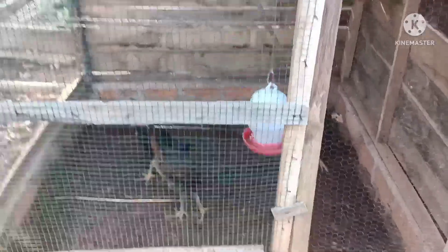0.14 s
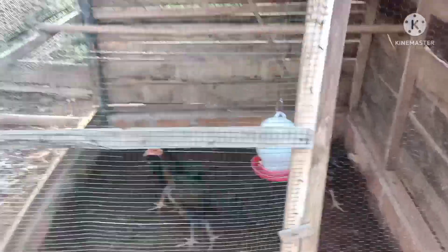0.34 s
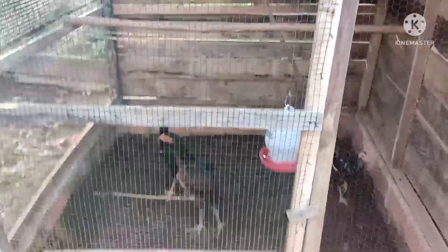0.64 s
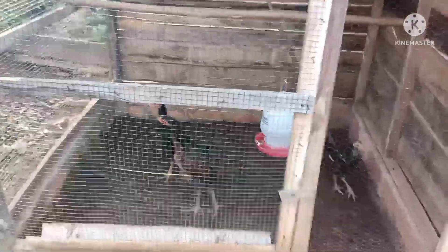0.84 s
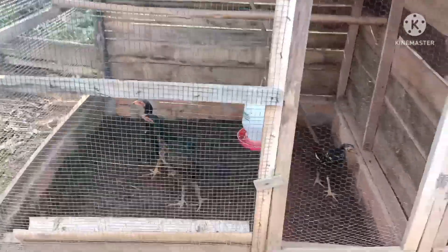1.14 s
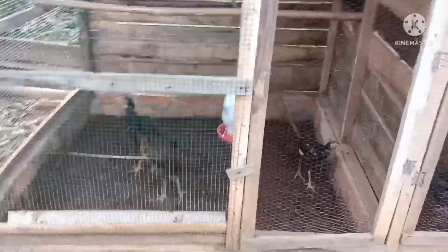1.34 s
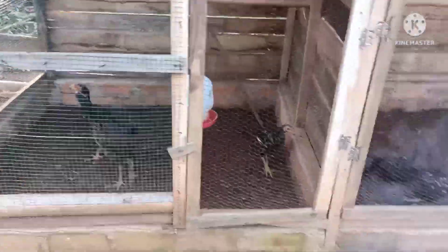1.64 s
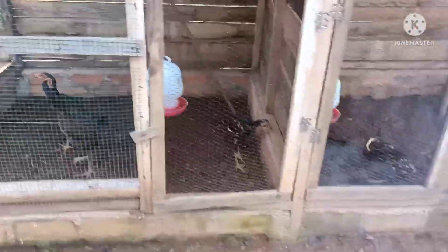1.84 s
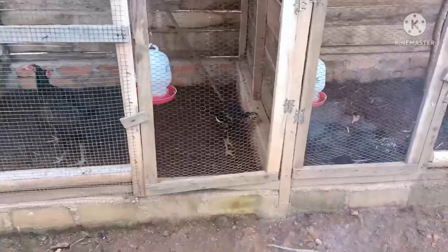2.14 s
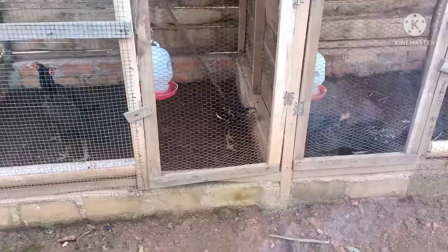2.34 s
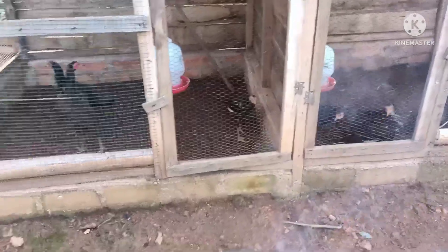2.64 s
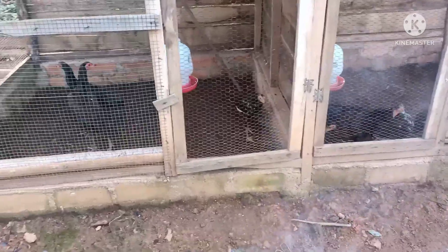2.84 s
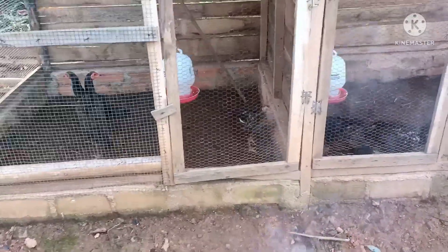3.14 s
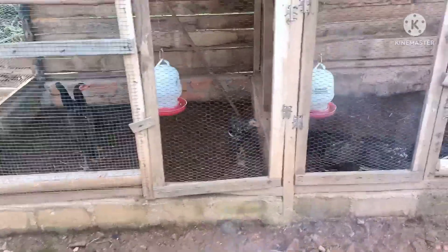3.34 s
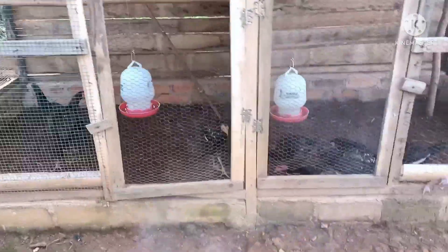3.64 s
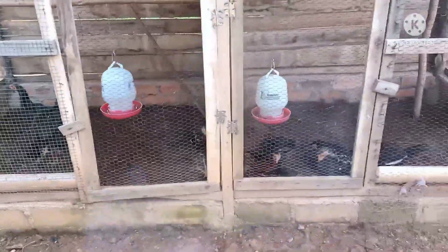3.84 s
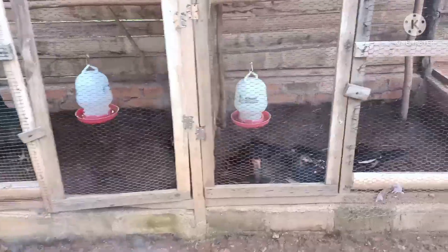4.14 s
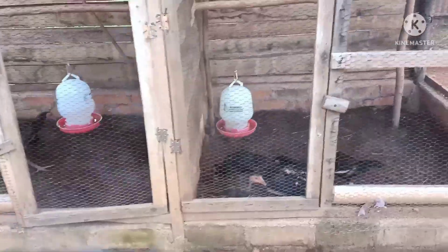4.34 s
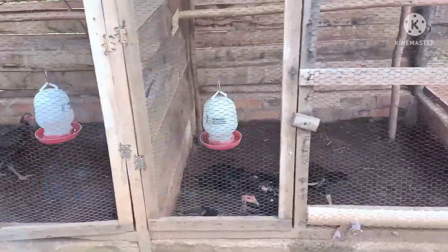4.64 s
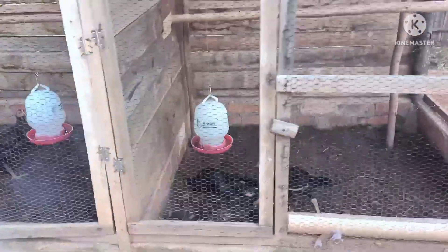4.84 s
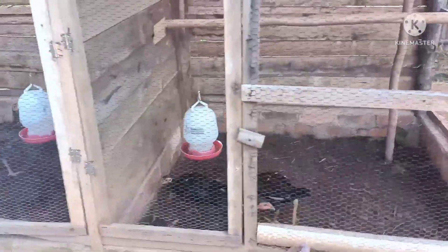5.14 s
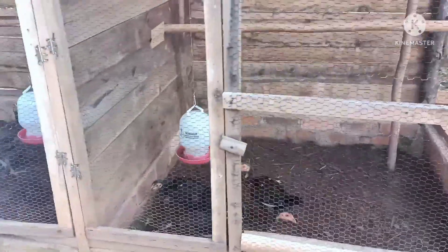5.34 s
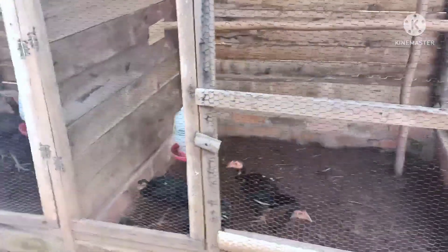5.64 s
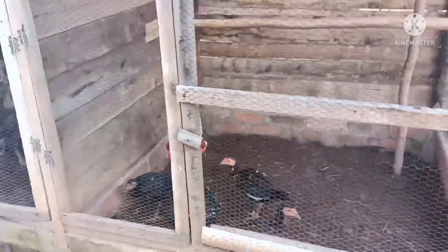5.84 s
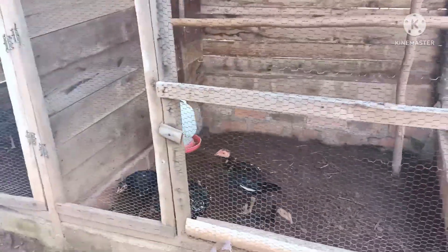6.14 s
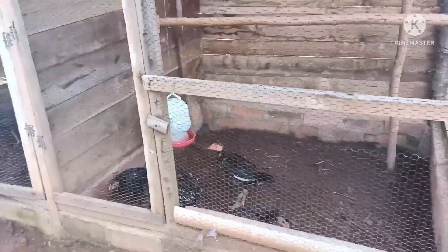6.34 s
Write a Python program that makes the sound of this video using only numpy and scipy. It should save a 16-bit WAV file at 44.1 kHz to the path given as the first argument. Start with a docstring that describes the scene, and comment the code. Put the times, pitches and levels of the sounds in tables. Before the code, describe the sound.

After some finger bumps on the microphone, chickens call hoarsely and cluck, with light pecking and faint peeps in a wooden coop.

```python
"""Hens in a plank and wire coop

Hens give three drawn-out calls that break into a rasp, among short clucks and soft croons: syrinx
harmonics shaped by throat and beak. Young birds peep, pecks ring on wood and wire, and the coop echoes.
A hand rubs and bumps the right microphone port at first. Behind it all lie spells of thin, high hiss
and a quiet outdoor rumble."""
import sys
import numpy as np
from scipy import signal
from scipy.fft import rfft, irfft
from scipy.io import wavfile
from scipy.ndimage import map_coordinates

SR = 44100
rng = np.random.default_rng(int(sys.argv[2]) if len(sys.argv) > 2 else 0)


def unload_audio(sound):
    """Save the sound as a 16-bit wav file, at the path given as the first command line argument."""
    columns = np.transpose(np.atleast_2d(sound))
    # keep every value between -1 and 1, then stretch to whole-number steps
    steps = np.round(np.clip(columns, -1, 1) * 32767)
    wavfile.write(sys.argv[1], SR, steps.astype(np.int16))


N = 285812
TIME = np.arange(N) / SR

# The throat of a calling hen. Each row: frequency in Hz, gain in dB.
CALL_THROAT = [(300, -41), (600, -27), (780, -21.5), (1100, 0), (1300, 4.5), (1550, -8), (1900, -13),
               (2550, -15.5), (3200, -23.5), (4500, -38.5), (5600, -42), (7000, -41.5), (10000, -62),
               (15000, -66)]
# Drawn-out calls. Each row: start and length in seconds, held pitch in Hz, level, brightness and
# fundamental boost in dB, roughness 0-1, overshoot as a share of pitch, its width in seconds, climb as a
# share of pitch, its time constant in seconds, seconds until the break, break boost in dB,
# left lead in ms, left minus right in dB.
CALLS = [(0.719, 0.276, 622.5, -29, 5.5, 2.5, 0.03, .11, 0.027, .16, .048, 0.24, 8, 0.5, -6),
         (2.973, 0.2768, 618.4, -33.5, 4.5, -0.5, 0.01, 0.037, 0.043, .145, .04, .238, 14.5, 0.44, 0),
         (4.826, 0.28, 635, -31.5, 3.5, 4, 0, 0.092, 0.017, .17, 0.018, .236, 9, 0.433, 2.5)]


def calls(scoop_share=.11, sag_db_per_s=14.5, attack_s=.017, release_s=.016):
    """A call scoops up hoarsely, overshoots, holds, then strains higher and louder until it breaks."""
    out = np.zeros((3, N))
    for (start, length, held_hz, level_db, bright_db, fundamental_db, rough, overshoot, overshoot_s,
         climb, climb_s, break_s, break_db, lead_ms, pan_db) in CALLS:
        t = TIME[:int(length * SR)]
        onset = np.exp(-(t / .012) ** 2)
        scoop = np.exp(-t / .014)
        arch = np.exp(-((t - .038) / overshoot_s) ** 2)
        strain = np.exp(np.minimum(t - break_s, 0) / climb_s)
        broken = .5 + .5 * np.tanh((t - break_s + .018) / .008)   # gives way just before the top
        pitch_hz = held_hz * (1 - scoop_share * scoop + overshoot * arch + climb * strain)
        dull_db = 10.5 * onset + 7 * strain * broken
        hoarseness = np.clip(rough + onset + .26 * broken, 0, 1)
        throat = [(hz, db + fundamental_db * (hz < 1.5 * held_hz)) for hz, db in CALL_THROAT]
        sound = voice(pitch_hz, bright_db - dull_db, hoarseness, throat, waver=.006, jitter=.056)
        # The held note tires, and the voice is weaker while it overshoots.
        effort_db = level_db - sag_db_per_s * t - .5 * arch + break_db * (strain + broken) / 2
        envelope = np.minimum(t / attack_s, 1) * np.minimum((length - t) / release_s, 1)
        add(out, start, placed(from_db(effort_db) * envelope * sound, lead_ms, pan_db))
    return out


# The rush of air through the open beak. Each row: frequency in Hz, gain in dB.
RASP_COLOUR = [(400, -22.5), (800, 3), (1300, 11), (1700, -19), (2300, 13.5), (3200, -17), (4400, -8.5),
               (5500, -30), (7000, -6.5), (10000, -41), (15000, -39)]


def voice(pitch_hz, bright_db, rough, throat, waver=.00463, jitter=.0545, doubling=.11):
    """Syrinx harmonics pass through the throat; a rough voice has uneven cycles and a rasp in each."""
    n = len(pitch_hz)
    unevenness = jitter * (rough + .04)
    pitch_hz = pitch_hz * (1 + unevenness * drift(272, n) + waver * drift(47, n))
    phase = 2 * np.pi * np.cumsum(pitch_hz) / SR
    tone = np.zeros(n)
    for k in range(1, 18):
        treble = np.clip((k * pitch_hz - 1500) / 350, 0, 1)
        shimmer_db = 3.5 * min(k / 5, 1) * drift(23.7, n)   # overtones flicker, the higher ones more
        gain = from_db(at_hz(throat, k * pitch_hz) + bright_db * treble + shimmer_db)
        tone += gain * np.sin(k * phase + rng.uniform(0, 2 * np.pi))
    flutter = drift(148, n)
    alternation = doubling * np.cos(phase / 2 + drift(47, n))   # strong and weak cycles take turns
    strength = 1 + rough * (flutter + alternation)
    puffs = rng.standard_normal(n) * (1 + np.cos(phase))
    rasp = from_db(-8) * (rough ** 1.5 + .035) * unit_rms(coloured(puffs, RASP_COLOUR))
    return np.sqrt(2) * tone * strength + rasp


# The throat with the beak half open. Each row: frequency in Hz, gain in dB.
CLUCK_THROAT = [(300, -35), (600, -27.5), (850, -13.5), (1150, 1.5), (1420, 0), (1800, -14.5),
                (2400, -10.5), (3100, -25.5), (4500, -34), (7000, -43.5), (15000, -75)]
# Short clucks. Each row: start and length in seconds, pitch in Hz, level and brightness in dB,
# roughness (full at 1), left lead in ms, left minus right in dB.
CLUCKS = [(0.387, 0.064, 676.5, -30, -2.5, 0.53, 0.34, -6.5),
          (0.607, 0.068, 691, -29.5, -5, 0.54, 0.29, -8.5), (1.224, 0.057, 590, -28, -5, 0.36, 0.36, 7.5),
          (1.761, 0.059, 651, -43.5, -6, 0.24, 0.078, 8), (2.851, 0.084, 587.6, -37, -4, 0.82, 0.35, 2),
          (3.473, 0.047, 569, -34, -10.5, 0.22, 0.077, 3.5), (4.158, 0.054, 687, -44.5, 1, 0.94, 0.23, -5),
          (4.491, .06, 629.6, -37.5, -8, 0.66, .33, 3.5), (4.722, 0.0676, 657, -35, -7, 0.56, 0.31, 4),
          (5.281, 0.078, 600, -26, -8.5, 0.27, 0.35, -1.5), (5.37, 0.045, 595, -49, 7, 0.7, 0.44, 0),
          (6.256, 0.08, 555.4, -48.5, 9.5, 1.03, 0.24, -3), (6.327, 0.06, 612, -52, 3.5, .9, 0.14, -2)]


def clucks(bend=.1686, dull_db=9):
    """A cluck is a hoarse little arch: pitch, level and brightness rise and fall with the effort."""
    out = np.zeros((3, N))
    for start, length, pitch_hz, level_db, bright_db, rough, lead_ms, pan_db in CLUCKS:
        effort = np.sin(np.pi * progress(length))
        arch = 1 + bend * (effort - .85)
        treble_db = bright_db - dull_db * (1 - effort)
        sound = voice(pitch_hz * arch, treble_db, min(rough, 1), CLUCK_THROAT, jitter=.05, doubling=.42)
        add(out, start, placed(from_db(level_db) * effort ** 2 * sound, lead_ms, pan_db))
    return out


# The throat with the beak closed. Each row: frequency in Hz, gain in dB.
CLOSED_BEAK = [(300, 9), (700, 0), (1300, 8), (2000, -10), (2700, -23), (4000, -35.5), (9000, -45)]
# Croons. Each row: start and length in seconds, first, middle and last pitch in Hz, level in dB,
# overtone gain in dB.
CROONS = [(0.816, 0.24, 311.6, 304.1, 340.6, -51, -22), (1.355, 0.12, 813, 775, 776, -55, -6),
          (1.519, 0.12, 684, 660, 710, -56, -9.5), (4.164, 0.3, 770.4, 650, 683, -54.5, -5.5),
          (5.349, 0.29, 673, 645, 653, -43.5, -15.5)]


def croons():
    """A hen at the back of the coop hums soft, sagging notes through her closed beak."""
    out = np.zeros(N)
    for start, length, first_hz, middle_hz, last_hz, level_db, overtone_db in CROONS:
        u = progress(length)
        pitch_hz = np.interp(u, [0, .25, .7, 1], [first_hz, middle_hz, middle_hz, last_hz])
        throat = [(hz, db + overtone_db * (hz > first_hz)) for hz, db in CLOSED_BEAK]
        sound = voice(pitch_hz, bright_db=0, rough=.44, throat=throat)
        add(out, start, from_db(level_db) * swell(u, edge=.13) * sound)
    return out


# Peeps. Each row: start and length in seconds, the glide's two ends in Hz before bowing, level in dB.
PEEPS = [(2.292, 0.026, 2980, 2530, -72), (2.456, 0.038, 1380, 1450, -66.5),
         (2.466, 0.027, 3100, 2960, -79), (2.682, 0.059, 1486, 1630, -69), (3.538, 0.031, 1680, 1910, -58),
         (3.839, 0.028, 2340, 2050, -83), (4.577, 0.019, 3180, 2900, -60), (4.777, 0.029, 3940, 3380, -59),
         (5.705, 0.042, 1640, 1680, -52.5), (5.803, 0.027, 1960, 2095, -64),
         (5.922, 0.039, 2310, 2030, -57.5)]


def peeps(bend=.07):
    """Young birds whistle short, bowed glides."""
    out = np.zeros(N)
    for start, length, from_hz, to_hz, level_db in PEEPS:
        u = progress(length)
        glide_hz = from_hz + (to_hz - from_hz) * u
        bow = 1 + bend * (np.sin(np.pi * u) - .7) + .018 * drift(170, len(u))
        whistle = np.sqrt(2) * np.sin(2 * np.pi * np.cumsum(glide_hz * bow) / SR)
        add(out, start, from_db(level_db) * swell(u, edge=.31) * whistle)
    return out


# The modes of a tapped spot. Each row: multiple of the ring frequency, gain in dB.
TAP_MODES = [(.55, -10), (1, 2.5), (1.7, -7.5), (2.9, -18.5)]
# The noise of a contact. Each row: frequency in Hz, gain in dB.
CONTACT_COLOUR = [(200, 9), (1000, 3.5), (4000, -17), (7000, -9), (10000, -18), (15000, -32)]
# Pecks and taps. Each row: start in seconds, level in dB, ring in Hz, seconds to fade by 60 dB,
# crack and tick gains in dB.
TAPS = [(.781, -24, 470, 0.018, -13, -30), (.8003, -8.5, 490, 0.013, -15, -14),
        (.889, -24.5, 390, 0.028, -23, -27), (1.84, -44, 890, 0.01, -7, -20),
        (2.2173, -38.5, 1440, 0.0065, -26, -16), (2.2299, -34, 2940, 0.0027, -16, -6),
        (2.436, -40, 710, 0.0077, -27, -29), (2.555, -49.5, 2000, 0.031, -20, -25),
        (2.775, -51.5, 2410, 0.018, -8, -28), (3.366, -40.5, 1470, 0.025, -3.5, -4),
        (3.617, -32.5, 2540, 0.0095, -23, -2.5), (3.64, -46.5, 720, 0.02, -3, -9),
        (3.772, -44.5, 680, 0.0073, -9, -15), (5.579, -39, 2340, 0.011, -7, -9),
        (5.7019, -31.5, 750, 0.0051, -4.5, -5.5), (5.864, -31.5, 2650, 0.003, -32, -33),
        (5.897, -38.5, 1255, 0.025, -4, -14), (6.109, -51.5, 2290, .025, -14, -20)]


def taps(crack_t60=.011, tick_hz=4700, tick_t60=.0017):
    """A peck on wood or wire gives a crack, a bright tick and a few quickly damped modes."""
    out, t = np.zeros(N), TIME[:SR // 10]

    def ring(hz, t60):
        spread_db = rng.normal(0, 2, len(TAP_MODES))
        modes = sum((-1) ** k * from_db(db + spread_db[k]) * np.sin(2 * np.pi * hz * ratio * t)
                    for k, (ratio, db) in enumerate(TAP_MODES))
        return .5 * modes * from_db(-60 * t / t60)

    for start, level_db, ring_hz, t60, crack_db, tick_db in TAPS:
        crack = from_db(crack_db - 60 * t / crack_t60) * noise(len(t), CONTACT_COLOUR)
        body = ring(ring_hz, t60)
        tick = from_db(tick_db) * ring(tick_hz, tick_t60)
        add(out, start, from_db(level_db) * (body + crack + tick))
    return out


# The click of skin meeting the case. Each row: frequency in Hz, decay in seconds, gain in dB.
SKIN_CLICK = [(1640, 0.0019, 0), (9400, 0.00022, -5.5)]
# Finger bumps. Each row: start in seconds, level in dB, pitch in Hz, decay in seconds, click gain in dB.
BUMPS = [(0.012, -16.5, 1420, 0.00089, -9), (0.0181, -13.5, 455, 0.0074, -46),
         (0.125, -20.5, 230, 0.0076, -26), (.178, -16, 183, 0.0095, -21), (.212, -11, 580, 0.00091, -33),
         (0.2195, -32, 670, 0.01, -16), (.36, -6.5, 363, 0.0048, -11), (0.3754, -20, 180, .013, -18),
         (.434, -18, 397, 0.0053, -27), (0.44, 0, 213, 0.0043, -21), (0.4654, -21, 153, 0.016, -4),
         (1.41, -18.5, 146, 0.0066, -28), (1.4196, -21, 165, 0.006, -21)]


def finger_bumps(slack=.13, scuff_db=-27):
    """A fingertip clicks on the case and pushes air into the port: a swing that slows as it dies."""
    out, t = np.zeros(N), TIME[:SR // 10]

    def push(hz, decay_s):
        fade = from_db(-60 * t / decay_s)
        press = fade * t ** 1.5
        swing = np.sin(2 * np.pi * np.cumsum(hz * (1 - slack + slack * fade)) / SR)
        scuff = from_db(scuff_db) * noise(len(t), CONTACT_COLOUR)
        return press / press.max() * (swing + scuff)

    for start, level_db, hz, decay_s, click_db in BUMPS:
        click = sum(from_db(click_db + db) * push(click_hz, click_s)
                    for click_hz, click_s, db in SKIN_CLICK)
        add(out, start, from_db(level_db) * (push(hz, decay_s) + click))
    return signal.sosfilt(signal.butter(1, 40, "high", fs=SR, output="sos"), out)


# The colour of skin sliding over the port. Each row: frequency in Hz, gain in dB.
RUB_COLOUR = [(40, -26), (130, 3), (300, 16.5), (700, 9.5), (2000, 6.5), (3500, -0.5), (7000, -5.5),
              (9000, -12), (15000, -16)]
# Strokes of the hand. Each row: start and length in seconds, level in dB, top-end sheen in dB.
STROKES = [(0, 0.013, -35, -5), (0.18, 0.055, -43, -3), (0.239, 0.029, -36, 3), (0.359, 0.13, -43.5, 4),
           (0.53, 0.57, -57, -6), (1.351, 0.11, -48, 10.5), (1.626, 0.016, -55.5, 4)]


def hand_rubbing(grain_db=2, attack_s=.017, release_db_per_s=378):
    """The skin sticks and slips in fine grains; each stroke has its own amount of top-end hiss."""
    friction = rng.standard_normal(N) * from_db(grain_db * drift(350, N))
    grains = unit_rms(coloured(friction, RUB_COLOUR))
    sheen = coloured(grains, [(6000, -60), (9000, -12), (12000, 0)])
    out = from_db(-75) * grains   # a faint, steady hiss on the right
    for start, length, level_db, sheen_db in STROKES:
        attack = np.clip((TIME - start) / attack_s, 0, 1)
        release_db = release_db_per_s * np.clip(TIME - start - length, 0, 1)
        out += attack * from_db(level_db - release_db) * (grains + (from_db(sheen_db) - 1) * sheen)
    return from_db(4) * out


# The coop's echo. Each row: band centre in Hz, seconds to fade by 60 dB, gain in dB.
ECHO_BANDS = [(199.5, 0.2, 3.5), (750, 0.45, 4.5), (1220, 0.52, -5.5), (1560, 0.41, 4.5), (2900, 0.29, 4.5),
              (4570, 0.4, 11), (6850, 0.24, 1), (14000, .2, 14)]


def coop_echo(sound):
    """Dense echoes bounce between the planks and die band by band."""
    t, hz = TIME[:SR], np.fft.rfftfreq(SR, 1 / SR)
    white = rfft(rng.standard_normal((2, SR)))
    centres_hz = [row[0] for row in ECHO_BANDS]
    tail = 0
    for (_, t60, db), solo in zip(ECHO_BANDS, np.eye(len(ECHO_BANDS))):
        band = np.interp(hz, centres_hz, solo)
        tail = tail + irfft(white * band, SR) * from_db(db - 60 * t / t60)
    build_up = np.clip((t - .003) / .00053, 0, 1)
    return signal.fftconvolve(sound[None], tail * build_up / np.sqrt(.033 * SR), axes=1)[:, :N]


# The colour of the thin hiss. Each row: frequency in Hz, gain in dB.
HISS_COLOUR = [(5500, -30), (6800, -13.5), (7200, -7), (7500, -18), (8200, -35)]
# Spells of hiss. Each row: start and length in seconds, level in dB.
HISS_SPELLS = [(0.387, 0.76, -70.5), (1.539, 0.64, -76), (4.236, 0.44, -75.5), (5.534, 0.44, -71.5),
               (6.273, 0.21, -72.5)]


def thin_hiss(tremble_db=2.5):
    """A high, narrow band of noise trembles as it swells and fades."""
    level = np.zeros(N)
    for start, length, level_db in HISS_SPELLS:
        add(level, start, from_db(level_db) * swell(progress(length), edge=.14))
    return level * from_db(tremble_db * drift(30, N)) * noise(N, HISS_COLOUR)


# The colour of the outdoor air. Each row: frequency in Hz, level in dB.
AIR_COLOUR = [(20, -88), (50, -77), (110, -77.5), (250, -88), (500, -98.5), (900, -108), (1300, -104),
              (2000, -106), (3500, -114), (8000, -118), (15000, -122)]
# How alike the air is at both ports. Each row: frequency in Hz, likeness 0-1.
AIR_LIKENESS = [(150, 0.94), (380, 0.86), (950, 0.05), (5000, .02)]
# The air's slow swell, played around its average. Each row: time in seconds, level in dB.
AIR_SWELL = [(1.55, -53.5), (1.8, -57), (4.84, -57.5), (5.39, -55), (6.48, -57.5)]


def outdoor_air(gain_db=1.5, wobble_db=.5):
    """A far rumble, centred in the bass, lies under a faint, wide hiss."""
    mid, side = rfft(rng.standard_normal((2, N)))
    alike = at_hz(AIR_LIKENESS, np.fft.rfftfreq(N, 1 / SR))
    stereo = irfft(np.sqrt(1 + alike) * mid + np.sqrt(1 - alike) * side * [[1], [-1]], N)
    swell_db = np.interp(TIME, *np.transpose(AIR_SWELL))
    level_db = gain_db + swell_db - swell_db.mean() + wobble_db * drift(8.1, N)
    return coloured(stereo, AIR_COLOUR) * np.sqrt(SR / 4) * from_db(level_db)


def placed(sound, lead_ms, pan_db):
    """A hen off to one side reaches the left port first; gives left, right and the sound at her beak."""
    late = map_coordinates(sound, [np.arange(len(sound)) - lead_ms * SR / 1000], order=3)
    return np.array([sound * from_db(pan_db / 2), late * from_db(-pan_db / 2), sound])


def from_db(db):
    return 10 ** (np.asarray(db) / 20)


def unit_rms(x):
    return x / np.sqrt(np.mean(x ** 2) + 1e-20)


def at_hz(curve, hz):
    """Read a curve on a log-frequency axis."""
    points_hz, values = np.transpose(curve)
    return np.interp(np.log(hz + 1e-3), np.log(points_hz), values)


def coloured(x, colour):
    """Filter by a curve of gains in dB."""
    n = x.shape[-1]
    return irfft(rfft(x) * from_db(at_hz(colour, np.fft.rfftfreq(n, 1 / SR))), n)


def noise(n, colour):
    """Coloured noise with an RMS of 1."""
    return unit_rms(coloured(rng.standard_normal(n), colour))


def drift(rate_hz, n):
    """A smooth random wander with a spread of about 1."""
    pole = np.exp(-2 * np.pi * rate_hz / SR)
    white = rng.standard_normal(n + SR // 2)
    return unit_rms(signal.lfilter([1], [1, -2 * pole, pole * pole], white))[-n:]


def progress(length_s):
    """A ramp from 0 to 1 over a note."""
    return np.linspace(0, 1, int(length_s * SR))


def swell(u, edge):
    """Fade in and out, each over the share `edge` of a note's progress u."""
    return np.sin(np.pi / 2 * np.clip(np.minimum(u, 1 - u) / edge, 0, 1))


def add(track, start_s, sound):
    """Mix a sound into a track."""
    i = int(start_s * SR)
    track[..., i:i + sound.shape[-1]] += sound[..., :max(N - i, 0)]


def scene():
    """Birds and taps in the echoing coop, hand and hiss on the right, and the air outside."""
    calling, clucking, chicks, pecks = calls(), clucks(), peeps(), taps()
    crooning = placed(croons(), lead_ms=.38, pan_db=2)
    hens = from_db(-1.5) * calling + from_db(-5) * clucking + from_db(-2.5) * crooning
    at_beaks = from_db(-5) * calling[2] + from_db(-8.5) * clucking[2] + from_db(-5.5) * crooning[2]
    echoes = coop_echo(at_beaks + from_db(-10) * pecks + from_db(-5) * chicks)
    on_right = (finger_bumps() + hand_rubbing() + thin_hiss()) * from_db([[-27], [0]])
    return hens[:2] + chicks + pecks + echoes + on_right + outdoor_air()


# The resonances and notches of the microphone ports. Each row: centre and width in Hz, gain in dB.
LEFT_PORT = [(7200, 2680, -20), (10100, 910, 22.5), (13400, 7500, -5)]
RIGHT_PORT = [(6800, 860, 10), (10270, 4370, -8), (14900, 1800, 6)]


def port(sound, resonances):
    """Each resonance of a port lifts or notches a band."""
    for hz, width_hz, db in resonances:
        b, a = signal.iirpeak(hz, hz / width_hz, fs=SR)
        sound = sound + (from_db(db) - 1) * signal.lfilter(b, a, sound)
    return sound


def record(dry):
    """Each port colours its side, then the top is cut steeply."""
    heard = np.array([port(dry[0], LEFT_PORT), port(dry[1], RIGHT_PORT)])
    cutoff_hz = 15650
    return signal.sosfilt(signal.ellip(12, .2, 80, cutoff_hz, fs=SR, output="sos"), heard)


dry = scene()
out = record(dry)
unload_audio(out)
```